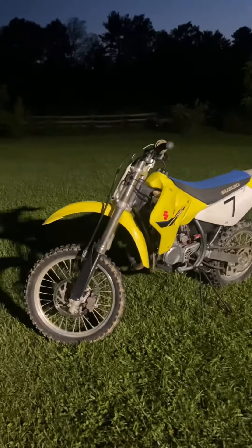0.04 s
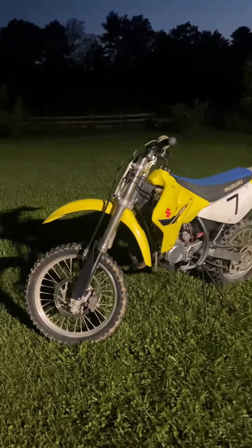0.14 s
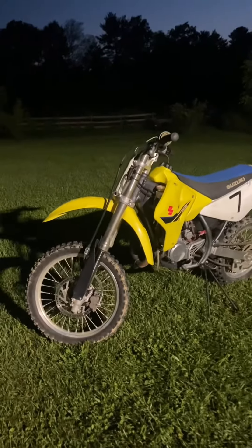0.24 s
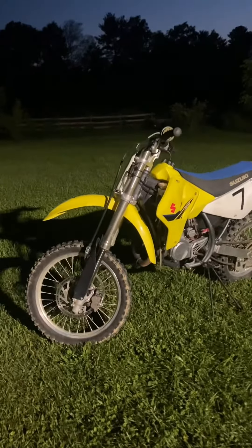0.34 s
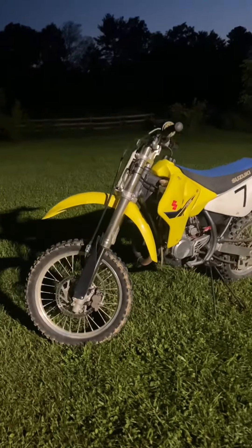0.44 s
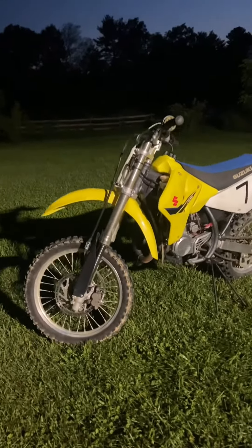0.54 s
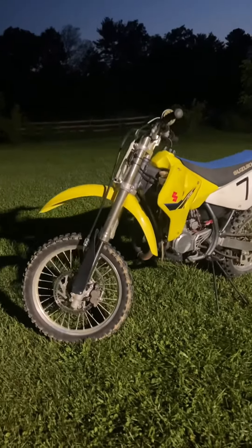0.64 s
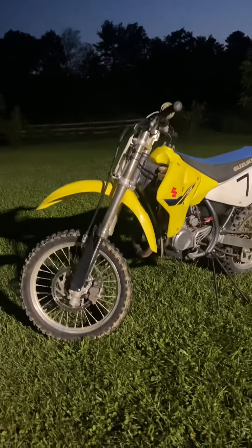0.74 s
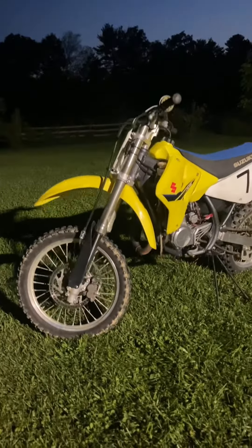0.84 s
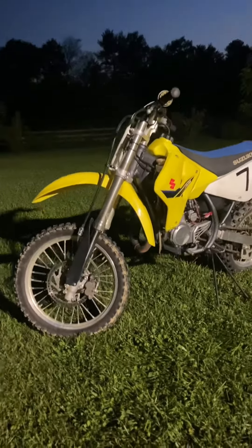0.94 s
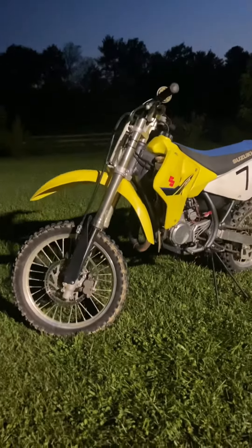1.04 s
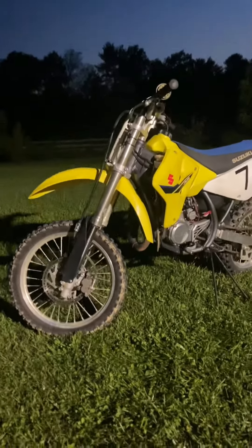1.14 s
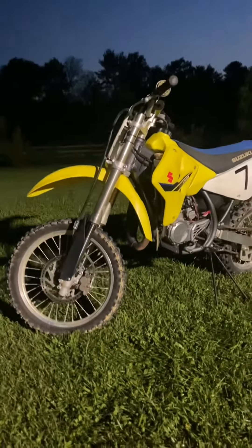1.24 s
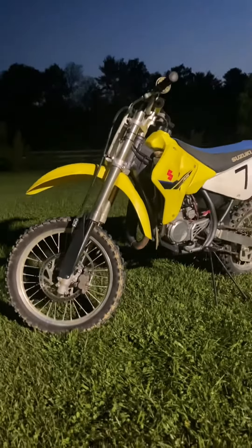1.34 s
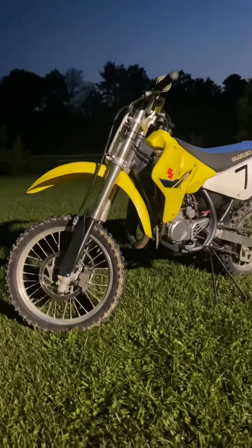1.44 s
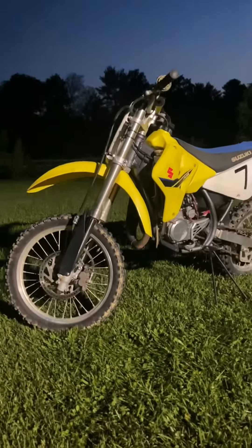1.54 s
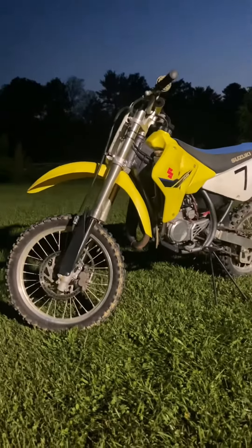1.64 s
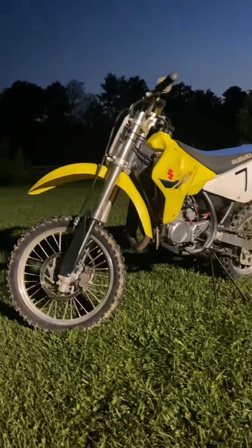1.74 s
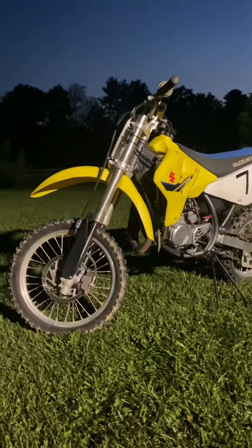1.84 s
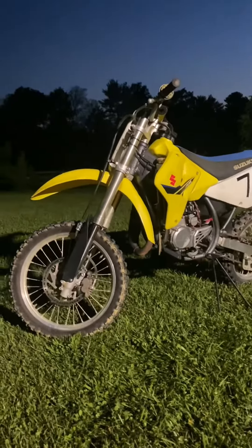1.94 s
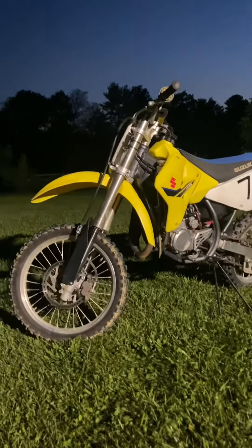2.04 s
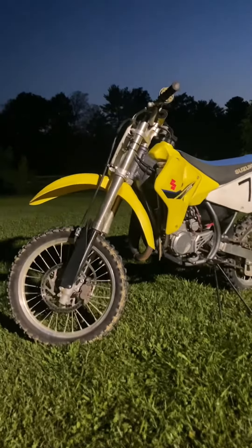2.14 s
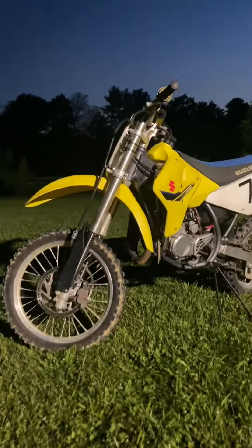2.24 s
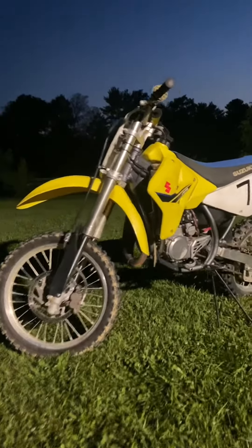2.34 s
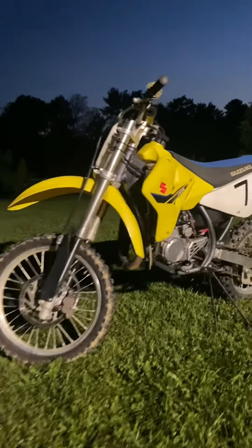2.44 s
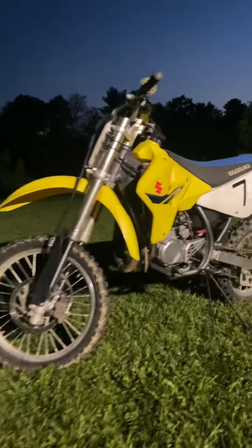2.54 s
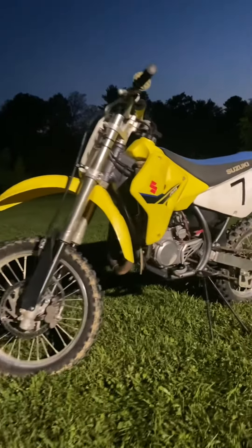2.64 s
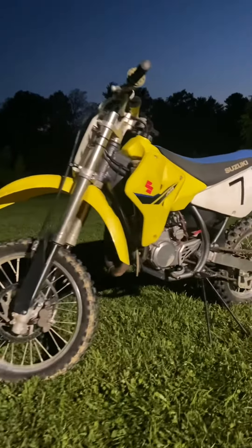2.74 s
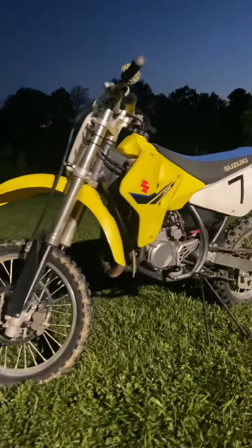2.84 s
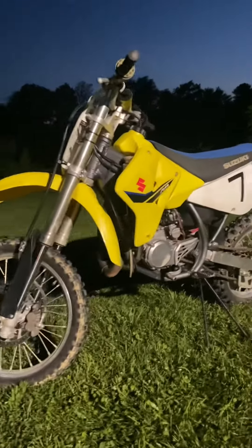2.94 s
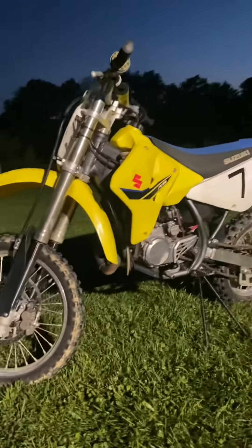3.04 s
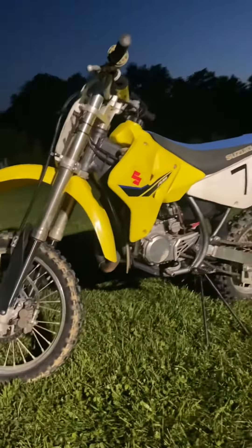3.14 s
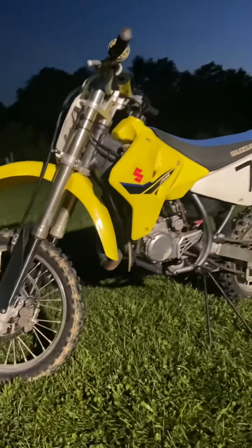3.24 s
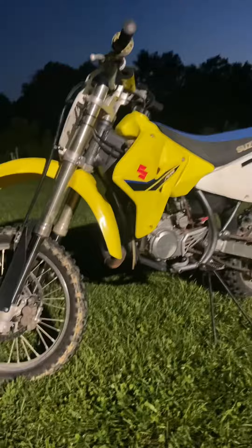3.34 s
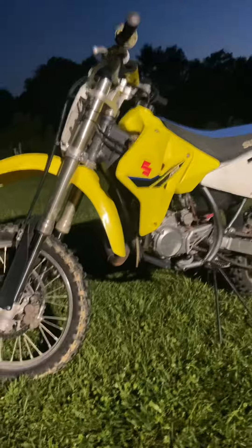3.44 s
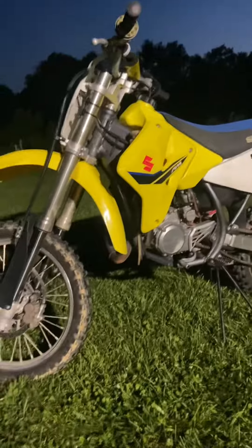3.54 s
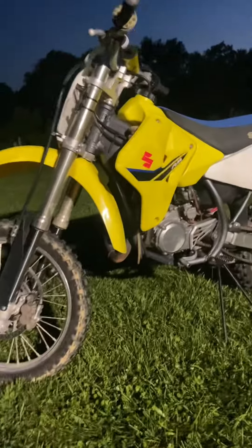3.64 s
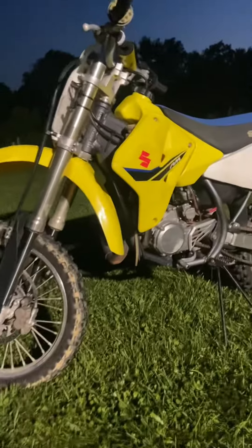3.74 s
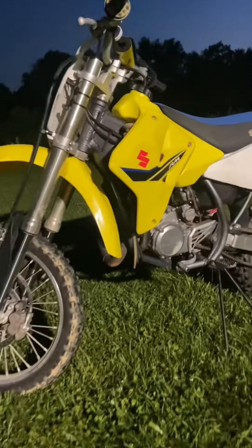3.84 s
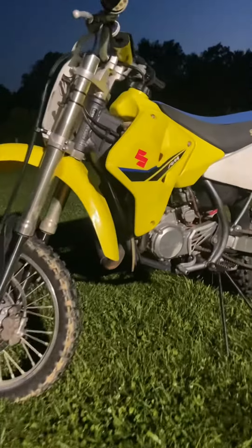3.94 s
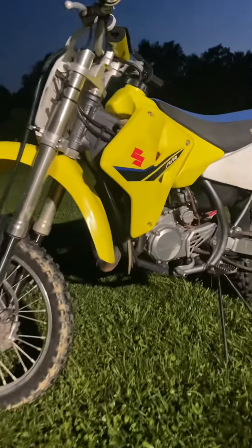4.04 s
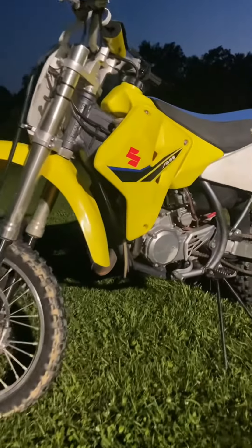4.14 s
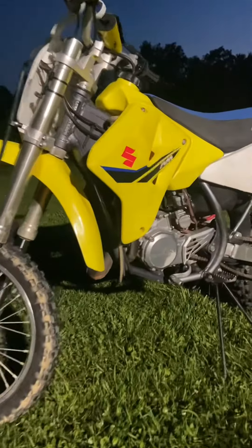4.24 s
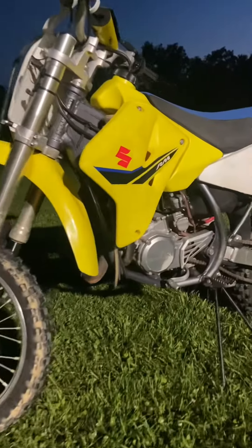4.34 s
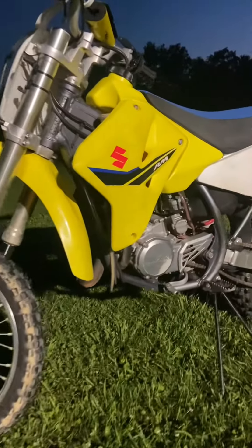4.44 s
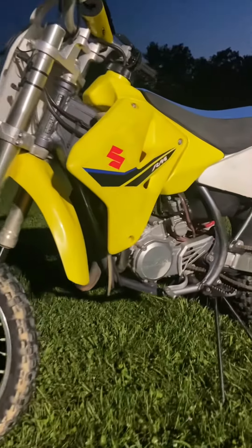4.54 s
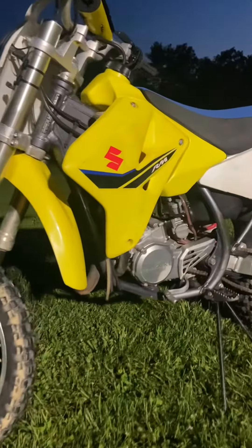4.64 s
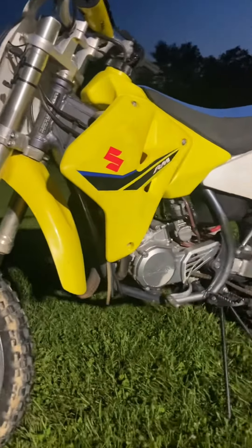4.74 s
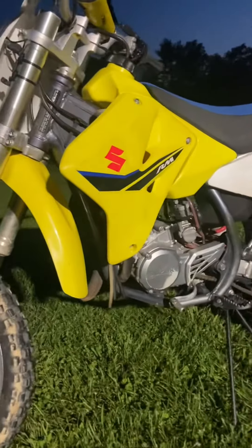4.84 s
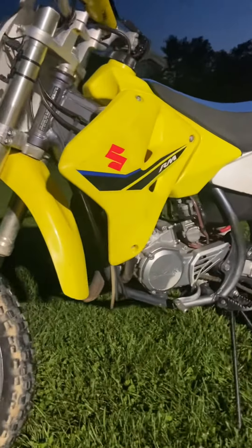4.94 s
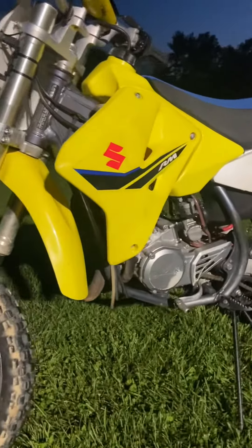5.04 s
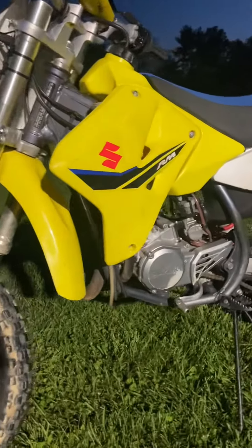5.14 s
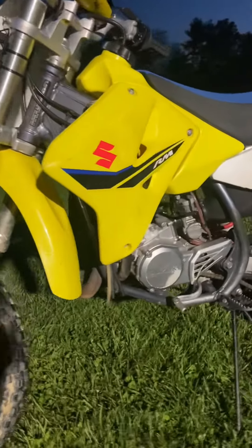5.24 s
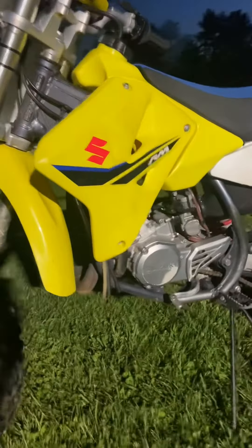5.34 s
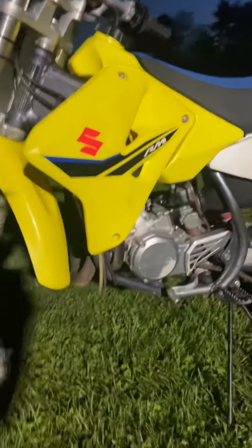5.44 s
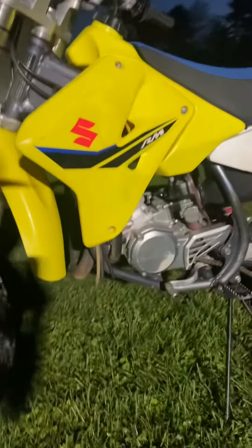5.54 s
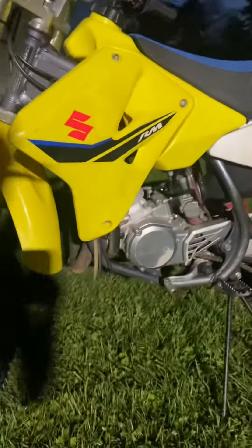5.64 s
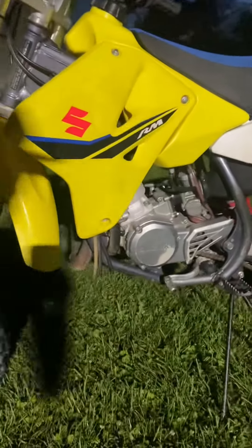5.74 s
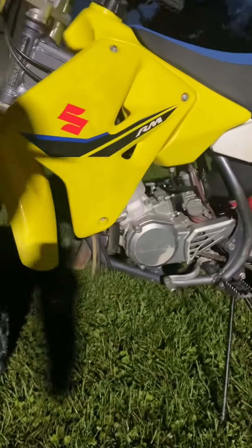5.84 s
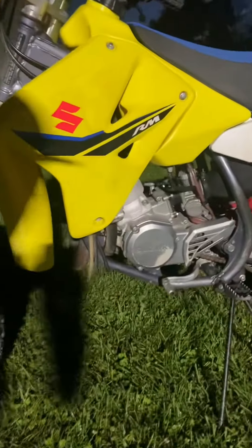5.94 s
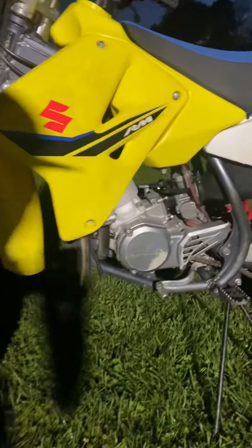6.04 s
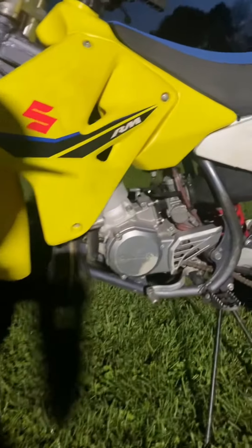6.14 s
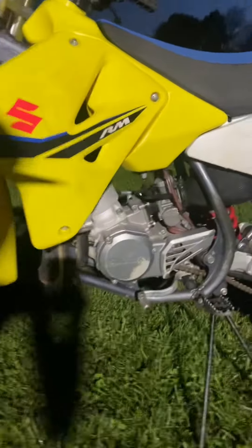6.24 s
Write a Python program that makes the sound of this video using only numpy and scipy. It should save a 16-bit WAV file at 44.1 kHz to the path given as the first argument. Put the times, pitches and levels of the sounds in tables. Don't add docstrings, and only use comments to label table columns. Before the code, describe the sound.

A small two-stroke motorcycle engine idles unevenly on a lawn, popping and chirping over fast puffs and metallic clatter, growing louder as the listener nears.

```python
import sys
import numpy as np
from scipy import signal
from scipy.fft import rfft, irfft
from scipy.io import wavfile
from scipy.ndimage import uniform_filter1d

SR = 44100
rng = np.random.default_rng(int(sys.argv[2]) if len(sys.argv) > 2 else 0)


def transcribe(u):
    v = np.clip(np.atleast_2d(u).T, -1, 1)
    q = np.round(v * 32767).astype(np.int16)
    wavfile.write(sys.argv[1], SR, q)


def volts_from_decibels(level):
    exponent = np.asarray(level, float) / 20
    return 10 ** exponent


N = 276948

TURNS_PER_S = 33.6
PUFF_DB = -24.5
USUAL_HISS_DB = -42


def evened(x):
    return x / np.sqrt(np.mean(x ** 2) + 1e-20)


def read(points, hz):
    f, value = np.transpose(points)
    return np.interp(np.log(hz + 1), np.log(f + 1), value)


def coloured(x, points):
    gain = volts_from_decibels(read(points, np.fft.rfftfreq(N, 1 / SR)))
    return irfft(rfft(x) * gain, N)


def ring(x, modes):
    out = np.zeros(N)
    for k, (hz, width, db) in enumerate(modes):
        out += (-1) ** k * volts_from_decibels(db) * signal.lfilter(*signal.iirpeak(hz, hz / width, SR), x)
    return out


def strikes(s, sizes, shape):
    at = np.round(s * SR).astype(int) + len(shape)
    keep = at < N + len(shape)
    impulses = np.bincount(at[keep], sizes[keep], N + len(shape))
    return signal.oaconvolve(impulses, shape)[len(shape):][:N]


def swell(delay, rise, t60):
    t = np.maximum(np.arange(8000) / SR - delay, 0)
    shape = (1 - np.exp(-(t / rise) ** 2)) * volts_from_decibels(-60 * t / t60)
    return shape / shape.max()


def chirp(centre, rise, fall, hz, glide, turn, edge):
    t = np.arange(4000) / SR - centre
    angle = 2 * np.pi * (turn + hz * t + glide * t * t / 2)
    bell = np.exp(-.5 * (t / np.where(t < 0, rise, fall)) ** 2)
    return np.sqrt(2) * bell * (np.cos(angle) + edge * np.cos(2 * angle - .6))


def wavering(db, samples):
    return volts_from_decibels(db * evened(uniform_filter1d(rng.standard_normal(N), samples)))


# time in seconds, share of the long tailpipe sweep 0-1,
# lag of the bounce off the lawn in ms, distance in m.
WALK = [
    (0, 0.75, 1.3, 2.7),
    (1.2, 0.72, 1.27, 2.08),
    (2.5, 0.91, 0.59, 1.91),
    (3.0, 0.42, 2, 1.67),
    (4.0, 0.63, 1.79, 1.3),
    (5.0, 0.34, 2.12, 1.08),
    (6.3, 0.7, 2.2, 1.06),
]


def puff_level(s):
    return PUFF_DB - 20 * np.log10(np.interp(s, *np.transpose(WALK)[::3]))


# time in seconds, hiss level in dB.
FIRINGS = [(-0.013, -42.5), (0.081, -45), (0.228, -45.5), (0.375, -40), (0.521, -39.5), (0.665, -42.5),
           (0.813, -39.5), (0.957, -42), (1.046, -45), (1.14, -40), (1.231, -50.5), (1.321, -43.5),
           (1.408, -46), (1.499, -45.5), (1.59, -47.5), (1.677, -48.5), (1.767, -41), (1.911, -44), (2, -52),
           (2.061, -50.5),
           (2.153, -43.5), (2.272, -44), (2.357, -60), (2.424, -40.5), (2.545, -42.5), (2.66, -38.5),
          (2.777, -49.5), (2.841, -41), (2.964, -40), (3.081, -39.5), (3.173, -45.5), (3.267, -40.5),
          (3.386, -49), (3.454, -42), (3.543, -52.5), (3.604, -40.5), (3.696, -48.5), (3.757, -49),
          (3.79, -44.5), (3.878, -39.5), (3.996, -42), (4.115, -37.5),
           (4.232, -37.5), (4.346, -46), (4.408, -39), (4.496, -39.5), (4.587, -37), (4.675, -49.5),
         (4.704, -40.5), (4.822, -42), (4.914, -39.5), (5.035, -38.5), (5.151, -40.5), (5.244, -40.5),
         (5.333, -39), (5.421, -46), (5.515, -36), (5.659, -36.5), (5.774, -40), (5.863, -45),
         (5.919, -42.5), (6.009, -43.5), (6.067, -45), (6.125, -44.5), (6.183, -46), (6.214, -41.5)]


def burns():
    return np.transpose(FIRINGS)


def heat():
    s, hiss_db = burns()
    return np.clip((hiss_db - puff_level(s) + 24) / 6, 0, 1)


def crank(sag=.075):
    fired = burns()[0]
    fired = np.r_[fired[0] - 1 / TURNS_PER_S, fired, fired[-1] + 3 / TURNS_PER_S]
    tops = []
    for start, gap in zip(fired[:-1], np.diff(fired)):
        turns = round(gap * TURNS_PER_S)
        share = np.arange(turns) / turns
        tops.append(start + gap * (share - sag * share * (1 - share)))
    return np.concatenate(tops)


# frequency in Hz, level in dB per Hz.
RUMBLE = [(20, -44), (40, -20), (70, -6), (100, -15), (180, -15), (300, -13), (400, -20), (600, -12),
          (900, -25), (1500, -30), (4000, -80)]


def rumble():
    level_db = -34 + 0.43 * (puff_level(np.arange(N) / SR) - PUFF_DB)
    return volts_from_decibels(level_db) * evened(coloured(rng.standard_normal(N), RUMBLE))


# frequency in Hz, width in Hz, level in dB.
CASE = [(302, 55, 8.5), (572, 140, 1), (805, 16, 2), (928, 37, -10), (1036, 67, -10), (1547, 53, -1.5),
        (2054, 260, -10), (2400, 280, -12), (2663, 75, -7.5), (3020, 95, -11), (3240, 70, -11.5),
        (3602, 410, -12.5), (4295, 230, -16)]
# frequency in Hz, width in Hz, level in dB.
WALLS = [(4310, 70, -7), (4810, 90, 2), (5132, 60, 4), (5382, 75, 7), (5570, 90, 2), (5790, 70, 0),
         (6050, 120, -2)]
# frequency in Hz, level in dB per Hz.
CLATTER = [(200, -30), (600, 0), (1000, -1.5), (2000, -4), (3500, -28), (5300, -13.5), (7000, -16.5),
           (11000, -22), (13000, -32), (14300, -25), (15500, -80)]


def clatter(tops, chance):
    gate = 0.39 + strikes(tops, volts_from_decibels(3.0 * chance[:, 2]), swell(0, 0.0029, 0.029))
    gate += 0.017 * strikes(tops, volts_from_decibels(3.2 * chance[:, 1]), swell(0.0045, 0.00069, 0.049))
    noise = rng.standard_normal((2, N))
    rattle = wavering(2.55, 60)
    parts = evened(coloured(gate * rattle * noise[0], CLATTER))
    parts += volts_from_decibels(1.5) * evened(ring(gate * rattle * noise[1], CASE))
    parts += volts_from_decibels(-14.5) * evened(ring(gate * noise[0], WALLS))
    return parts + volts_from_decibels(-4.5) * piston_slap(tops, chance)


def piston_slap(tops, chance):
    slap = chirp(0.00366, 0.00047, 0.0044, 1091, 0, turn=.0, edge=0)
    slap += 0.78 * chirp(0.00652, 0.002, 0.017, 699.4, -8000, turn=.0, edge=0)
    return evened(strikes(tops, volts_from_decibels(3.0 * chance[:, 3]), slap))


def side_cover(tops, chance):
    seen = np.interp(tops, (5.2, 5.7), (0, 1))
    sizes = seen * volts_from_decibels(-10 + 2.2 * chance[:, 2])
    return strikes(tops, sizes, chirp(0.00492, 0.0025, 0.0074, 915, 0, turn=.0, edge=0))


def intake_puffs(tops, chance):
    burnt = np.zeros(len(tops))
    burnt[np.searchsorted(tops, burns()[0] - .002)] = heat()
    sizes = volts_from_decibels(.7 * chance[:, 1]) * (1 - 0.66 * burnt)
    puff = chirp(0.02842, 0.0073, 0.011, 133.6, -2400, turn=.1, edge=.12)
    return evened(strikes(tops + .0004 * chance[:, 0], sizes, puff))


def turning():
    tops = crank()
    chance = rng.standard_normal((len(tops), 4))
    level = intake_puffs(tops, chance) + side_cover(tops, chance) + volts_from_decibels(-9) * clatter(tops, chance)
    return volts_from_decibels(puff_level(np.arange(N) / SR)) * level + rumble()


# time in seconds,
# pipe walls in dB over hiss, header note in dB, outlet pop in dB, tailpipe bark in dB.
FACING = [(0, -3.5, -39, -27.5, -20.5), (0.9, -4.5, -34.5, -24.5, -20), (1.4, 2, -40, -41, -17.5),
          (2.2, 4.5, -35, -53, -19), (2.5, 5, -28.5, -25, -21.5), (2.9, 0.5, -32, -28, -14),
          (3.1, 2, -27.5, -48, -13.5), (3.45, 2.5, -32, -43, -15), (3.7, -0.5, -32, -27.5, -16.5),
          (4.9, -0.5, -29.5, -26.5, -16.5), (5.3, -1.5, -29.5, -19, -16.5), (5.95, 2, -30, -21, -16.5),
          (6.2, 0, -32, -18, -14.5)]


def facing(column):
    table = np.transpose(FACING)
    return np.interp(burns()[0], table[0], table[column])


def over_usual():
    return burns()[1] - USUAL_HISS_DB


def knock():
    s, hiss_db = burns()
    bursts = strikes(s, volts_from_decibels(hiss_db + 6.5), swell(0, 0.0021, 0.066))
    return bursts * evened(ring(rng.standard_normal(N), CASE[3:]))


# frequency in Hz, level in dB per Hz.
BLAST = [(300, -9), (1500, -1.5), (3000, -8.5), (5500, -7), (7000, -3), (9000, -5), (11000, -6.5),
         (12500, -7), (14000, -17), (15500, -19.5)]


def gas_hiss():
    s, hiss_db = burns()
    bursts = strikes(s, volts_from_decibels(hiss_db + 8.0), swell(0.00098, 0.011, 0.11))
    return bursts * wavering(2.6, 40) * evened(coloured(rng.standard_normal(N), BLAST))


def pipe_walls():
    s, hiss_db = burns()
    bursts = strikes(s, volts_from_decibels(hiss_db + facing(1)), swell(0, 0.0046, 0.16))
    walls = bursts * evened(ring(rng.standard_normal(N), WALLS))
    return 0.64 * walls + volts_from_decibels(3.0) * ring(walls, WALLS)


def header_notes():
    s = burns()[0]
    high = chirp(.007, .003, .006, 740, -9000, turn=.0, edge=0)
    low = chirp(.021, .005, .012, 580, -3500, turn=.0, edge=0)
    high_db = facing(2) + 0.1 * over_usual()
    low_db = high_db + 3.5 + puff_level(s) - PUFF_DB
    notes = strikes(s, volts_from_decibels(high_db), high) + strikes(s, heat() * volts_from_decibels(low_db), low)
    return notes * (1 + 0.1 * evened(uniform_filter1d(rng.standard_normal(N), 150)))


def outlet_pops():
    sizes = heat() * volts_from_decibels(facing(3) + 0.21 * over_usual())
    return strikes(burns()[0], sizes, chirp(.0165, .0013, .0022, 450, 0, turn=.0, edge=.2))


def tailpipe_bark():
    s = burns()[0]
    long = np.interp(s, *np.transpose(WALK)[:2])
    loud = heat() * volts_from_decibels(facing(4) + 0.6 * over_usual())
    long_sweep = chirp(0.02161, 0.0033, .011, 177, 5560, turn=0.03, edge=0.035)
    short_sweep = chirp(0.0237, 0.0032, 0.0079, 186, 2700, turn=0.097, edge=0.084)
    return strikes(s, loud * long, long_sweep) + strikes(s, loud * (1 - long), short_sweep)


def firing():
    return knock() + gas_hiss() + pipe_walls() + header_notes() + outlet_pops() + tailpipe_bark()


def lawn(x):
    s, _, lag_ms, _ = np.transpose(WALK)
    late = np.arange(N) - np.interp(np.arange(N) / SR, s, lag_ms) * SR / 1000
    dull = signal.lfilter(*signal.butter(1, 2000, fs=SR), x)
    return x + volts_from_decibels(-16.0) * np.interp(late, np.arange(N), dull)


# frequency in Hz, half turns by which left leads.
LEAD = [(2000, 0), (3100, .3), (3600, .15), (4100, .25), (5000, .05), (5700, .3), (7250, 1), (10500, 2),
        (13600, 3), (15900, 4)]
# frequency in Hz, left minus right in dB.
TILT = [(60, 0), (200, .2), (380, .6), (700, 3.8), (1290, 3.6), (2380, -3), (4400, 0), (15000, 0)]
# frequency in Hz, level in dB.
SCATTER = [(40, -14), (70, -30), (250, -24), (700, -16), (1500, -12), (3000, -7), (5000, -11), (15000, -11)]


def scene():
    engine, scattered = (lawn(turning() + firing()) for _ in range(2))
    hz = np.fft.rfftfreq(N, 1 / SR)
    half = np.exp(.5j * np.pi * read(LEAD, hz)) * volts_from_decibels(read(TILT, hz) / 2)
    unlike = rfft(coloured(scattered, SCATTER))
    ports = rfft(engine) + np.array([unlike, -unlike])
    return irfft(ports * np.array([half, 1 / half]), N)


def top_cut(x):
    return signal.sosfilt(signal.butter(12, 17030, fs=SR, output="sos"), x)


def record(dry):
    lowpass = signal.firwin(511, 15800, window=("kaiser", 9), fs=SR)
    limited = signal.oaconvolve(dry, lowpass[None], "same")
    return top_cut(limited)


dry = scene()
out = record(dry)
transcribe(out)
```